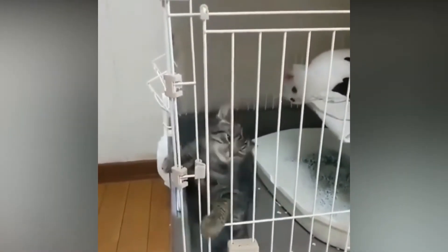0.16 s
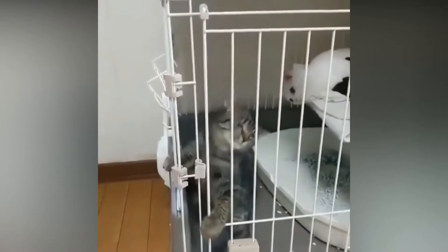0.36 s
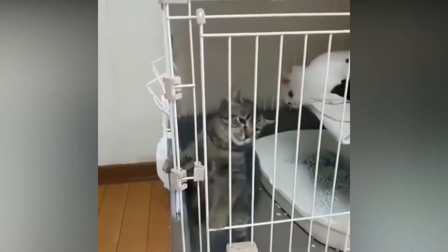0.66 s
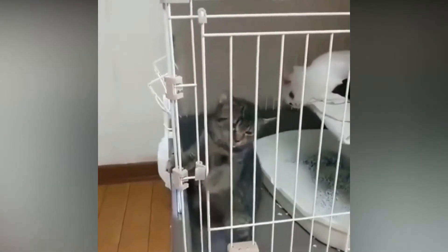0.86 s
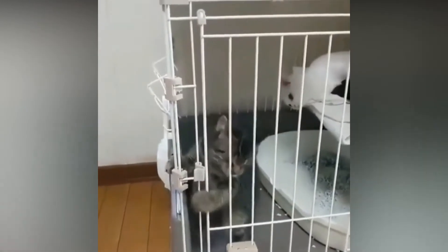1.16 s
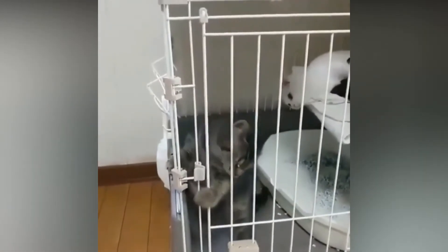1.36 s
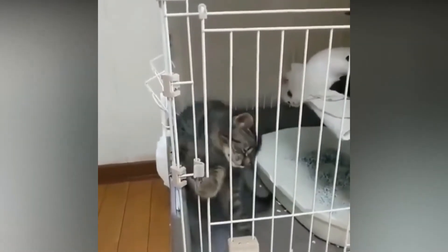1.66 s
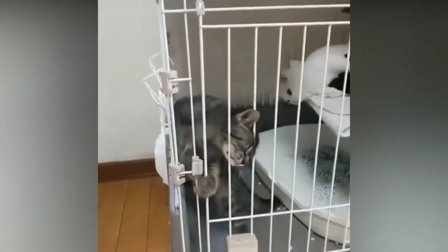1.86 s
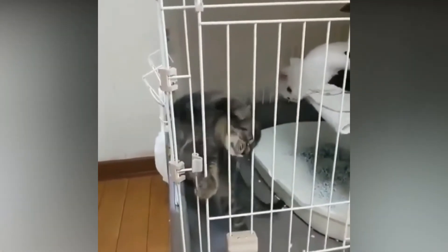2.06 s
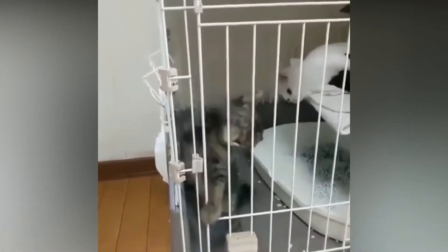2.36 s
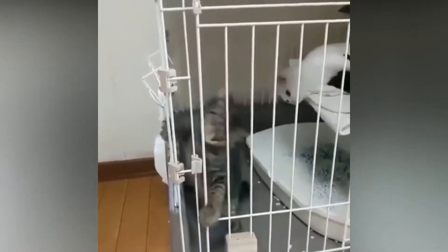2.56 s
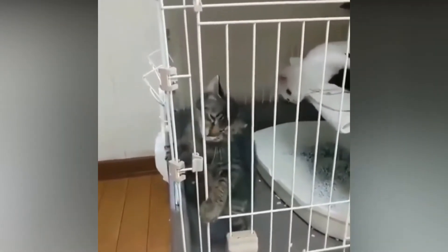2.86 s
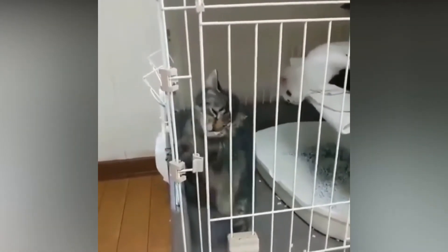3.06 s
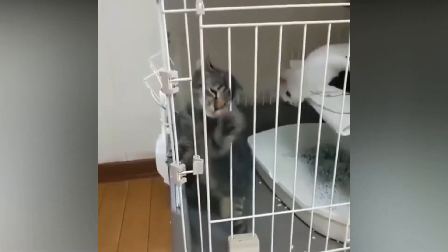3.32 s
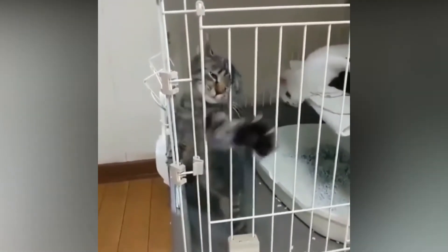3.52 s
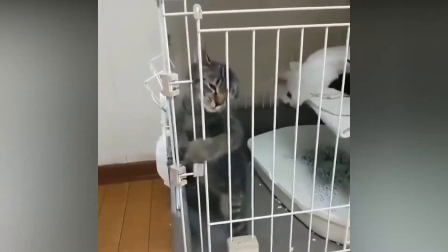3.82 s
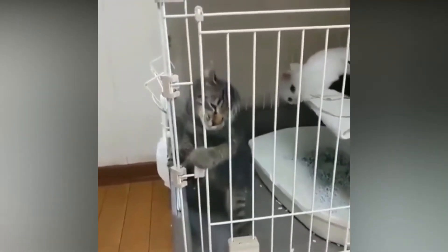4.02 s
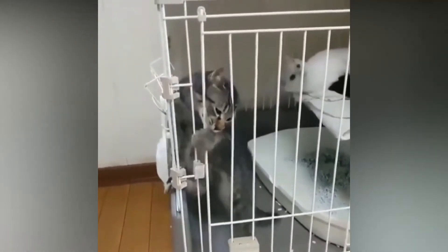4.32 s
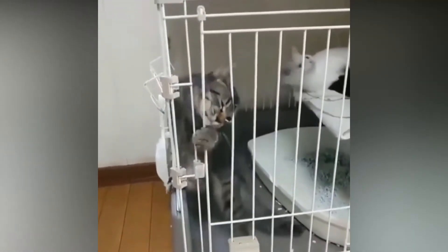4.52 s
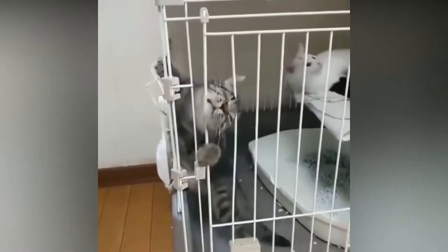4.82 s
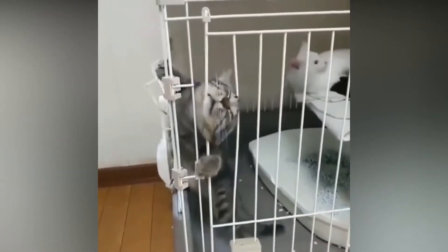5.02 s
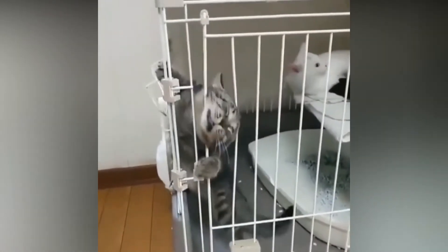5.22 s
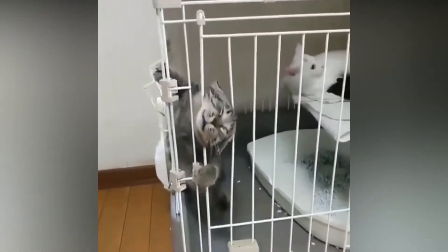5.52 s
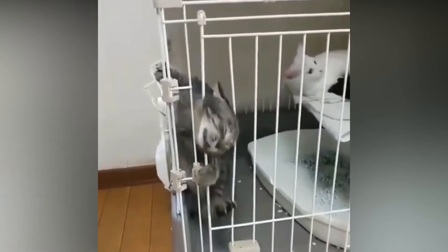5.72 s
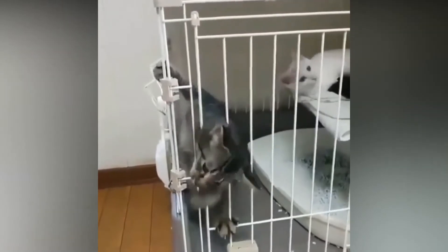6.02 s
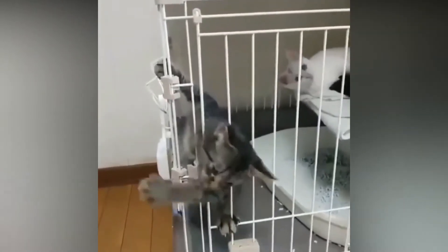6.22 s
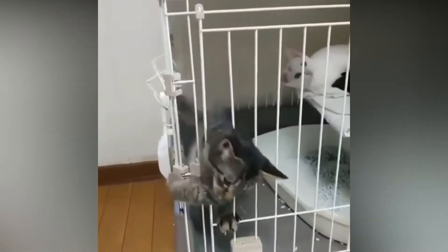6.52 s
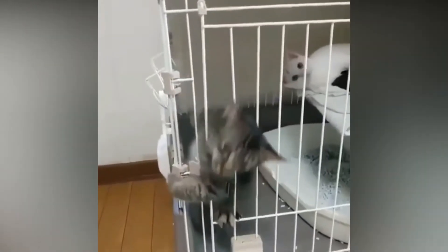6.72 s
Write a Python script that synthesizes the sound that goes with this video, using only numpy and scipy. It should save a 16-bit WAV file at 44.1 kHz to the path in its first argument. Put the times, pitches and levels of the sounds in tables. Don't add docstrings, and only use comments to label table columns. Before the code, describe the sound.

A wire cage is clawed and shaken on wooden boards in a small bare room, close to the microphone, over soft room tone and hiss. A light rattle and bump open it, then faint scuffing. From about 0.8 to 1.3 seconds thin bars clink and the tray knocks; at 1.6 to 1.7 come dull plastic thumps with little metal. Quiet taps follow around 2.3 and 2.7. At 3.2 a brighter clink lands with a low thud, and at 3.9 a sharp metallic clack leads several ticks. From 4.5 to 5.1 it is busiest: hollow tray knocks, bars ringing, the loose door chattering densely. A few taps fade by 5.4, leaving a lull. Near 6.0 a hard clank meets the deepest, heaviest floor thud; small ticks follow, and a dull tray bump at 6.6 ends it.

```python
import sys
import numpy as np
from scipy import signal
from scipy.fft import rfft, irfft
from scipy.io import wavfile
from scipy.ndimage import map_coordinates

SR = 44100
rng = np.random.default_rng(int(sys.argv[2]) if len(sys.argv) > 2 else 0)


def to_wav(sig):
    pcm = np.clip(np.atleast_2d(sig), -1, 1) * 32767
    pcm = np.round(pcm).astype(np.int16)
    wavfile.write(sys.argv[1], SR, pcm.T)


def makeup_ratio(level_db):
    decades = np.asarray(level_db, float) / 20
    return 10 ** decades


N = 303406

# t/s, peak level/dB, panel f/Hz, t60/s, rim share/dB
LANDINGS = [(0.891, -42.5, 395, 0.36, -2), (0.949, -31, 430, 0.04, -12), (1.602, -28.5, 580, 0.19, -11),
            (1.942, -39, 542, 0.19, -16), (2.723, -38.5, 520, 0.091, -8), (3.222, -32, 555, 0.19, -1),
            (3.872, -34.5, 565, 0.16, -1.5), (4.35, -44.5, 507, 0.25, -7.5), (4.52, -33, 520, 0.14, -19),
            (4.54, -25, 550, 0.17, -15), (5.978, -30.5, 542, 0.29, -1.5), (6.5871, -27.5, 524, 0.13, -9.5)]
UNEVEN_DB = 1.5


def rms_one(x):
    return x / np.sqrt(np.mean(x ** 2) + 1e-20)


def low_pass(x, hz, order):
    return signal.sosfilt(signal.butter(order, hz, fs=SR, output="sos"), x)


def resonances(x, modes, uneven_db=0):
    out, power = 0, 0
    for k, (hz, width, level_db) in enumerate(modes):
        radius = np.exp(-np.pi * width / SR)
        gain = makeup_ratio(level_db) / np.sqrt(np.pi * width / SR)
        b = gain * (1 - radius ** 2) / 2 * np.array([1, 0, -1])
        a = [1, -2 * radius * np.cos(2 * np.pi * hz / SR), radius ** 2]
        drift = np.interp(np.arange(N) / 2048, np.arange(150), rng.standard_normal(150))
        exposed = makeup_ratio(uneven_db * drift)
        out = out + (-1) ** k * signal.lfilter(b, a, x * exposed + 1e-18)
        power += makeup_ratio(2 * level_db)
    return out / np.sqrt(power)


def grains(per_s, spread_db):
    sizes = makeup_ratio(spread_db * np.minimum(rng.exponential(1, N), 4))
    signs = rng.choice([-1, 1], N)
    return rms_one(sizes * signs * (rng.random(N) < per_s / SR))


def blow_shape(t, level_db, t60, rise_s):
    return (1 - np.exp(-t / rise_s)) * makeup_ratio(level_db - 60 * t / t60)


def dying(starts, levels_db, t60s, rise_s):
    power, t = np.zeros(N + SR), np.arange(SR // 2) / SR
    for s, level_db, t60 in zip(starts, levels_db, t60s):
        power[round(s * SR):][:len(t)] += blow_shape(t, level_db, t60, rise_s) ** 2
    return np.sqrt(power[:N])


def rings(starts, levels_db, pitches_hz, t60s, rise_s):
    out, t = np.zeros(N + SR), np.arange(SR // 2) / SR
    for s, level_db, hz, t60, rise in np.broadcast(starts, levels_db, pitches_hz, t60s, rise_s):
        ring = blow_shape(t, level_db, t60, rise) * np.sin(2 * np.pi * hz * t)
        out[round(s * SR):][:len(t)] += ring
    return out[:N]


def air():
    # f/Hz, density/dB per Hz
    spectrum = [(22, -17), (65, 4.5), (260, -13), (1020, -21), (3300, -34.5), (4600, -30), (5600, -29),
                (6100, -38.5), (7400, -34), (8000, -23.5), (9200, -28.5), (10700, -44), (13150, -45),
                (13250, -84)]
    level_db, patchy_db, drift_per_s = -50, 1.5, 6
    knot_hz, knot_db = np.transpose(spectrum)
    hz = np.maximum(np.fft.rfftfreq(N, 1 / SR), 1)
    shape_db = np.interp(np.log(hz), np.log(knot_hz), knot_db)
    even = rms_one(irfft(rfft(rng.standard_normal(N)) * makeup_ratio(shape_db), N))
    _, t, frames = signal.stft(even, SR, nperseg=512)
    patches = rng.standard_normal((40, 200))
    where = np.meshgrid(np.linspace(0, 39, len(frames)), t * drift_per_s, indexing="ij")
    swell = makeup_ratio(patchy_db * map_coordinates(patches, where, order=1))
    return makeup_ratio(level_db) * signal.istft(frames * swell, SR, nperseg=512)[1][:N]


def boards(weight_db):
    # t/s, peak level/dB, f/Hz, t60/s
    thuds = [(0.092, -37, 90, 0.2), (0.856, -42, 76.6, 0.2), (0.901, -37, 88.5, 0.15),
             (0.988, -33, 90, 0.065), (1.224, -41.5, 109.4, 0.28), (1.605, -35, 95, 0.31),
             (1.665, -31.5, 76, 0.12), (1.94, -45.5, 85.5, 0.54), (2.319, -39, 97, 0.12),
             (2.556, -36, 87, 0.16), (3.229, -27.5, 84, 0.12), (3.271, -28, 74.5, 0.095),
             (3.888, -28, 78, 0.16), (3.998, -43, 83, 0.16), (4.34, -41, 79.6, 0.15),
             (4.388, -31.5, 88.6, 0.13), (2.336, -40, 95, 0.086), (4.544, -36.5, 79, 0.38),
             (4.869, -32, 109.5, 0.22), (4.949, -31.5, 89, 0.3), (4.93, -35.5, 200, 0.2),
             (6.07, -46, 158.2, 0.37), (3.235, -41, 155.4, 0.3), (5.441, -37, 86, 0.17),
             (5.96, -37, 79.4, 0.33), (6.0319, -23, 90, 0.11), (6.0443, -18.5, 82, 0.067),
             (6.112, -40, 80.6, 0.052), (6.409, -46, 56.5, 0.18), (6.585, -31.5, 86.6, 0.22)]
    # f/Hz, width/Hz, level/dB
    board_modes = [(53.3, 16.6, 2.5), (91, 14.3, 5), (110, 12, -28)]
    rise_s = 0.0096
    s, peak_db, hz, t60 = np.transpose(thuds)
    thud = rings(s, peak_db + 6.0, hz, t60, np.minimum(rise_s, 0.043 * t60))
    joist = rings(s, peak_db - 16.5, 157, 0.36, 5.2 * rise_s)
    land_s, land_db = np.transpose(LANDINGS)[:2]
    boom = rings(land_s, land_db - 12.5, 208, 0.26, rise_s)
    stir = makeup_ratio(weight_db - 5.0) * resonances(rng.standard_normal(N), board_modes)
    return thud + joist + boom + stir


def tray(scuff_db):
    # t/s, peak level/dB, panel f/Hz, t60/s
    raps = [(0.064, -43, 577, 0.065), (0.089, -32, 346, 0.15), (0.985, -50, 463, 0.22),
            (1.218, -44, 357, 0.22), (1.553, -44, 394, 0.3), (1.755, -51.5, 407, 0.4),
            (3.913, -37, 342, 0.24), (4.0, -38.5, 426, 0.46), (4.456, -40.5, 493, 0.16),
            (4.658, -38.5, 400, 0.22), (4.756, -30.5, 592, 0.5), (4.789, -31, 474, 0.46),
            (4.948, -24, 463, 0.13), (5.061, -38.5, 463, 0.17), (5.2353, -33, 520, 0.092)]
    # t/s, peak level/dB, panel f/Hz, t60/s
    pats = [(0.388, -53, 390, 0.091), (0.573, -50.5, 464, 0.2), (1.24, -44.5, 297, 0.24),
            (1.66, -38, 390, 0.16), (1.716, -26, 490, 0.061), (2.289, -37, 480, 0.14),
            (2.579, -47.5, 630, 0.29), (2.639, -40.5, 376, 0.47), (2.684, -34.5, 510, 0.098),
            (3.245, -30.5, 378, 0.11), (3.833, -50, 405, 0.38), (3.959, -35, 423, 0.16),
            (4.298, -46.5, 512, 0.28), (4.871, -23, 597, 0.23), (5.304, -33.5, 473, 0.086),
            (5.344, -41.5, 487, 0.085), (6.041, -29.5, 302, 0.3), (6.199, -41, 473, 0.12),
            (6.618, -37.5, 371, 0.37), (6.601, -32, 370, 0.14), (6.664, -41, 464, 0.26),
            (2.303, -42, 420, 0.1), (2.342, -43, 480, 0.08), (4.428, -40, 460, 0.08)]
    # f/Hz, width/Hz, level/dB
    middle_modes = [(283, 10, -2.5), (377.5, 17.4, -2), (463, 30.5, 5), (507, 100, -12), (780, 310, -15),
                    (520, 563, 6.5)]
    base_modes = [(148, 123, -0.5), (220, 106, 2)]
    rim_modes = [(766, 220, 8), (928, 63, 2.5), (1015, 440, 8), (1310, 160, 4), (1140, 1700, 4.5)]
    knocks = [(*blow, -2, share_db) for *blow, share_db in LANDINGS]
    knocks += [(*blow, -15.5, -4) for blow in raps]
    knocks += [(*blow, -16.5, -14.5) for blow in pats]
    s, peak_db, hz, t60, base_db, rim_db = np.transpose(knocks)

    panel = rings(s, peak_db - 0.1, hz, 0.3 * t60, rise_s=0.0003)
    bumps = grains(per_s=2500, spread_db=0.0)
    bumps[np.round(s * SR).astype(int) + 90] += 12.0
    middle_env = dying(s, peak_db - 2.5, t60, rise_s=0.005) + makeup_ratio(scuff_db - 13)
    base_env = dying(s, peak_db + base_db + 4, 1.4 * t60, rise_s=0.016) + makeup_ratio(scuff_db - 15.0)
    rim_env = dying(s, peak_db + rim_db - 0.5, 0.84 * t60, rise_s=0.0017) + makeup_ratio(scuff_db - 23.5)
    middle = resonances(bumps * middle_env, middle_modes, UNEVEN_DB)
    base = resonances(bumps * base_env, base_modes)
    rim = resonances(bumps * rim_env, rim_modes, UNEVEN_DB)
    return low_pass(panel + middle + base + rim, 2180, order=2)


def pings():
    # t/s, peak level/dB, f/Hz, t60/s
    plucks = [(.776, -38.5, 7970, 0.051), (0.7745, -35.5, 4549, 0.1), (0.7745, -41.5, 3763, 0.06),
              (0.7745, -39, 4188, 0.045), (0.7745, -34, 5300, 0.015), (.881, -44, 1400, 0.054),
              (1.231, -36, 1060, 0.025), (1.6, -42.5, 7750, 0.039), (1.6, -38, 2500, 0.036),
              (2.291, -46, 4180, 0.09), (3.865, -32.5, 10700, 0.037), (3.915, -38, 1900, 0.068),
              (4.006, -33, 1990, 0.04), (.987, -33.5, 490, 0.018), (5.065, -32.5, 820, 0.021),
              (4.073, -52, 4000, 0.22), (3.2165, -34, 9200, 0.02), (3.2165, -40, 6700, 0.02),
              (3.248, -38, 9900, 0.02), (.7745, -36, 8650, 0.018), (1.942, -47, 7700, .03),
              (0.09, -37.5, 1050, 0.069), (5.236, -45, 1350, 0.09), (4.785, -34, 7200, .05),
              (4.8, -50, 1990, 0.24), (4.863, -29, 8060, 0.071), (4.87, -29, 1990, 0.15),
              (4.89, -39, 10700, 0.13), (6.195, -51, 6900, 0.034), (1.424, -53, 4000, 0.027),
              (1.458, -53, 3950, 0.024), (1.491, -54, 4140, 0.036), (6.195, -56, 4400, 0.035),
              (6.68, -51.5, 4150, 0.03), (1.2105, -36.5, 9000, 0.025), (1.2105, -42, 6200, 0.02),
              (1.2105, -42, 5400, 0.015), (1.6, -46, 4600, 0.03), (1.602, -41, 2200, 0.1),
              (4.54, -37.5, 1900, 0.052), (4.567, -43.5, 1370, 0.11), (4.945, -38, 1990, 0.11),
              (4.765, -40, 1990, 0.1), (3.9805, -37, 9700, 0.02), (3.865, -38, 8800, 0.02),
              (.88, -39.5, 7100, 0.033)]
    beat_hz, beat_depth = 69.6, 0.25
    s, peak_db, hz, t60 = np.transpose(plucks)
    twin_hz = hz + beat_hz * rng.uniform(-1.5, 1.43, len(s)) * (hz > 1500)
    wire = rings(s, peak_db, hz, t60, 0.00026)
    twin = rings(s, peak_db, twin_hz, t60, 0.0003)
    return (1 - beat_depth / 2) * wire + beat_depth * twin


def cage():
    # t/s, peak level/dB, struck bar f/Hz, rattle t60/s, frame share/dB
    grabs = [(0.0825, -41.5, 4740, 0.085, -1), (0.0874, -36.5, 3890, 0.12, -1),
             (0.2264, -47.5, 3800, 0.1, 0.5), (0.88, -38.5, 3910, 0.12, -7), (1.2104, -34, 3990, 0.11, -6),
             (1.5464, -48, 4830, 0.094, 6), (1.5988, -42.5, 5000, 0.17, 2.5),
             (1.7085, -46.5, 4850, 0.061, 2), (1.939, -54.5, 4640, 0.36, 0), (2.293, -51, 4030, 0.12, -5),
             (2.6535, -47.5, 4960, 0.17, -5), (3.2156, -35, 5240, 0.13, -8.5), (3.248, -35, 4740, 0.11, -4),
             (3.865, -29, 4150, 0.12, -2), (3.981, -36.5, 4300, 0.22, -3),
             (4.5369, -36.5, 4480, 0.19, -7.5), (4.7487, -31.5, 5010, 0.64, -7.5),
             (4.781, -27.5, 4590, 0.16, -1.5), (4.8618, -27, 4800, 0.21, 0), (4.94, -29.5, 5040, 0.21, -5),
             (5.2268, -51, 4380, 0.2, 4), (5.9749, -29.5, 4800, 0.15, -2), (6.017, -39.5, 4160, 0.31, -0.5),
             (6.588, -69, 5500, 0.21, 8)]
    # t/s, peak level/dB, struck bar f/Hz, rattle t60/s, thin-wire
    # share/dB
    rebounds = [(0.0523, -48.5, 4940, 0.11, -4), (0.7745, -35.5, 4720, 0.16, -2), (1.653, -42, 4280, 0.18, -5),
                (3.8744, -35, 4120, 0.16, 2.5), (3.9142, -20, 3980, 0.046, -6.5),
                (4.0065, -31, 4010, 0.086, -15), (4.0723, -44, 4160, 0.25, -4),
                (4.5165, -37.5, 5320, 0.092, -3), (4.6495, -40, 4290, 0.1, 0), (4.653, -38, 4060, 0.18, -2),
                (4.7555, -33, 5010, 0.15, -6), (4.767, -34, 4590, 0.1, -2), (4.7975, -33, 3960, 0.15, -8),
                (4.8085, -34, 4590, 0.1, -8), (4.868, -35, 4590, 0.1, -4), (4.889, -33, 4590, 0.1, -8),
                (4.904, -36, 4500, 0.12, -12), (4.9465, -35, 5030, 0.11, -4), (4.963, -32, 5000, 0.1, -10),
                (3.8855, -40, 4100, 0.08, 0), (3.935, -41, 4030, 0.1, 2), (4.0165, -38, 4050, 0.1, -6),
                (3.2535, -40.5, 4020, 0.1, -4), (4.8206, -32, 4500, 0.31, -22),
                (4.8787, -29.5, 4640, 0.15, -16), (4.9544, -29, 4450, 0.11, -13),
                (5.0644, -49, 4320, 0.1, -20), (5.967, -39, 4730, 0.11, 2), (5.9835, -20.5, 4040, 0.07, -9),
                (6.0476, -31.5, 3960, 0.18, -5), (6.196, -52, 4060, 0.18, -1)]
    # f/Hz, width/Hz, level/dB
    frame_modes = [(1372, 44, -6.5), (1760, 39, -13), (1992, 31, -4.5), (2217, 60, -10.5), (2388, 210, 3),
                   (1890, 2100, 9.5), (3170, 1200, -4)]
    bar_modes = [(3784, 120, -4), (4010, 310, 2), (4590, 140, -1.5), (5005, 145, 3), (5090, 240, 0.5),
                 (5680, 220, -2), (4630, 1660, 3)]
    wire_modes = [(6840, 130, 8.5), (7460, 370, 17), (7900, 45, 15), (8040, 97, 14.5), (8330, 99, 20.5),
                  (8630, 68, 14), (9200, 220, 13), (9460, 60, 9), (9900, 130, 18.5), (10400, 70, 17),
                  (10670, 60, 16), (11080, 150, 14.5), (12900, 500, 15), (8200, 2500, 29)]
    *grab_blows, grab_frame_db = np.transpose(grabs)
    *rebound_blows, rebound_wire_db = np.transpose(rebounds)
    s, peak_db, hz, t60 = np.hstack([grab_blows, rebound_blows])
    frame_db = np.r_[grab_frame_db, np.full(len(rebounds), -13.5)]
    grab_wire_db = 2.5 + 0.22 * np.minimum(grab_blows[1] + 29.5, 0)
    wire_db = np.r_[grab_wire_db, rebound_wire_db]

    struck = rings(s, peak_db - 3.5, hz, np.minimum(0.36 * t60, 0.035), rise_s=0.00016)
    chatter = grains(per_s=3500, spread_db=2.5)
    chatter[np.round(s * SR).astype(int) + 12] += 14.0
    frame_env = dying(s, peak_db + frame_db - 0.1, 1.47 * t60, rise_s=0.0007)
    bars_env = dying(s, peak_db - 7.5, t60, rise_s=0.0005)
    wires_env = dying(s, peak_db + wire_db - 11.0, 0.89 * t60, rise_s=0.00029)
    frame = resonances(chatter * frame_env, frame_modes, UNEVEN_DB)
    bars = resonances(chatter * bars_env, bar_modes, UNEVEN_DB)
    wires = resonances(chatter * wires_env, wire_modes, UNEVEN_DB)
    return struck + pings() + low_pass(frame, 5300, order=2) + low_pass(bars, 6200, order=2) + wires


def room(x):
    t60_s, first_wall_s, wall_cut_hz = 0.36, 0.004, 4100
    t = np.arange(SR // 2) / SR
    echoes = rng.standard_normal(len(t)) * makeup_ratio(-60 * t / t60_s) * (t > first_wall_s)
    echoes = low_pass(echoes, wall_cut_hz, order=1)
    return signal.fftconvolve(x, echoes / np.sqrt(np.sum(echoes ** 2)))[:N]


def microphone(x):
    # f/Hz, width/Hz, depth/0-1
    hollows = [(3070, 700, 0.47), (5950, 250, 0.2), (11960, 900, 0.7)]
    for hz, width, depth in hollows:
        x = x - depth * signal.lfilter(*signal.iirpeak(hz, hz / width, fs=SR), x)
    return low_pass(x, 9900, order=2)


def scene():
    # t/s, weight shifting on the boards level/dB, fur and paws on the tray level/dB
    shuffle = [(0.0, -61, -33), (0.44, -45, -50.5), (0.67, -77, -55), (0.86, -33.5, -36), (1.05, -59, -69),
               (1.24, -37.5, -44), (1.5, -54, -44.5), (2.8, -72, -62.5), (3.32, -62, -35.5),
               (3.62, -45, -61), (4.02, -40.5, -38.5), (4.39, -49.5, -52.5), (4.83, -35, -28.5),
               (5.04, -43.5, -38), (5.6, -65, -51), (6.09, -29, -40), (6.38, -54.5, -46), (6.7, -38.5, -52)]
    s, weight_db, scuff_db = np.transpose(shuffle)
    t = np.arange(N) / SR
    near = cage() + tray(np.interp(t, s, scuff_db))
    heard = microphone(near + makeup_ratio(-12) * room(near))
    return (heard + boards(np.interp(t, s, weight_db)) + air())[None]


def top_cut(x):
    return signal.sosfilt(signal.butter(12, 13730, fs=SR, output="sos"), x)


def record(dry):
    x = signal.sosfilt(signal.butter(2, 40, "high", fs=SR, output="sos"), dry)
    x = low_pass(x, 13300, order=6)
    return top_cut(x)


dry = scene()
out = record(dry)
to_wav(out)
```